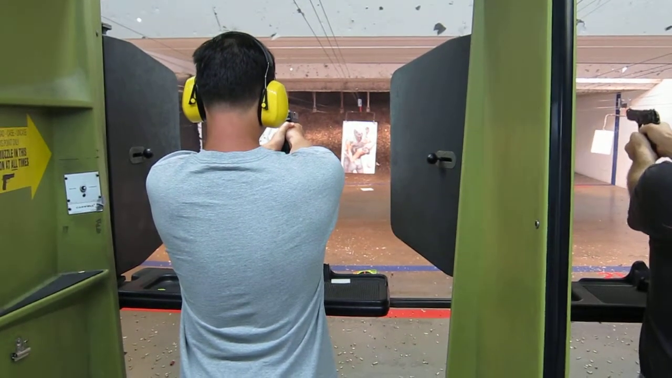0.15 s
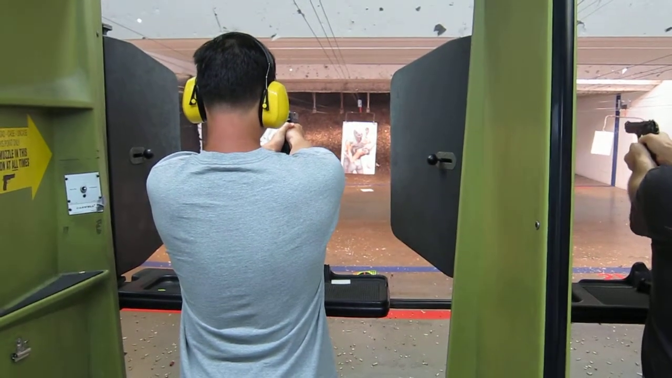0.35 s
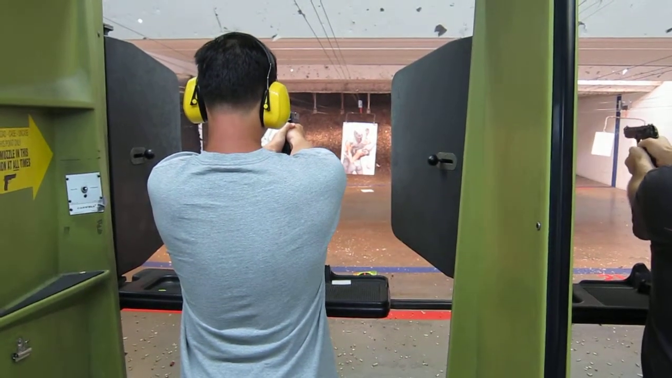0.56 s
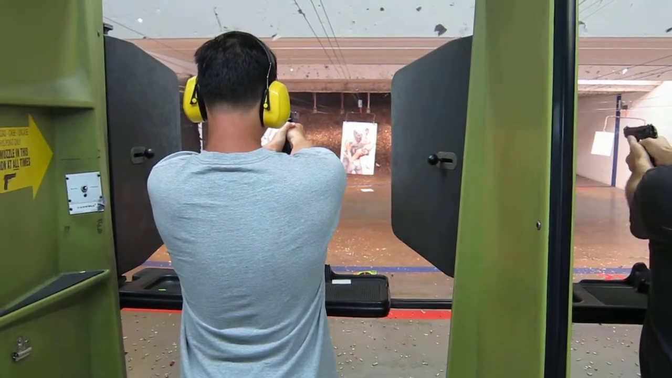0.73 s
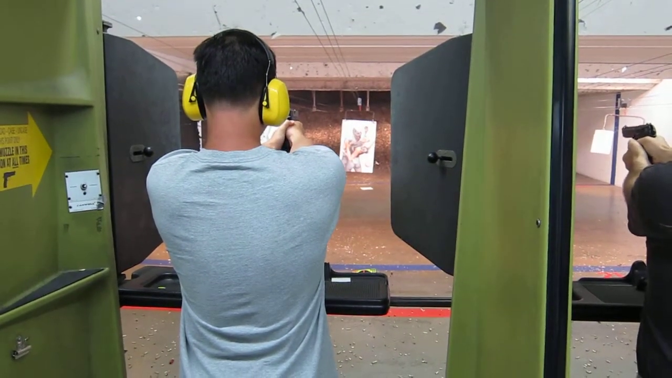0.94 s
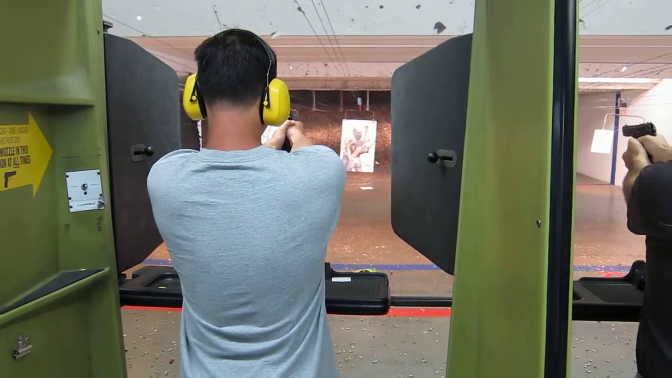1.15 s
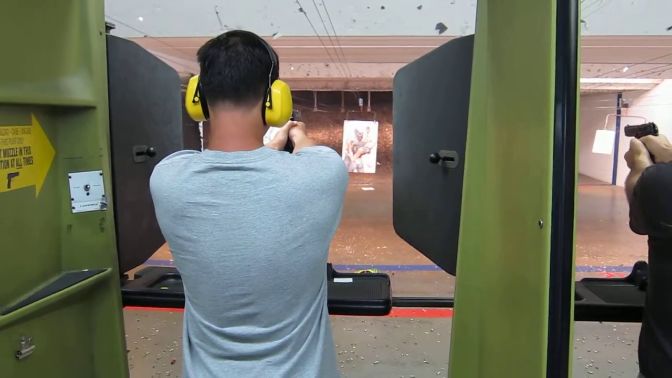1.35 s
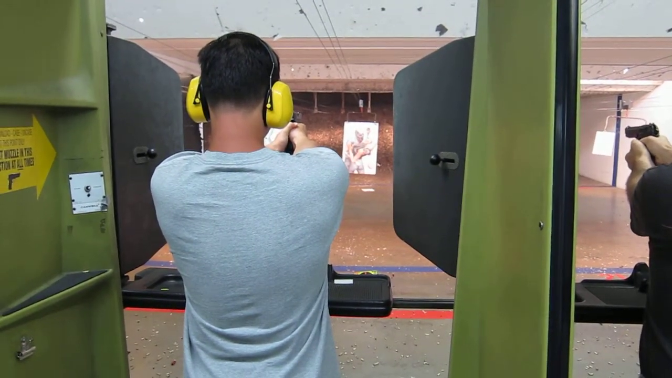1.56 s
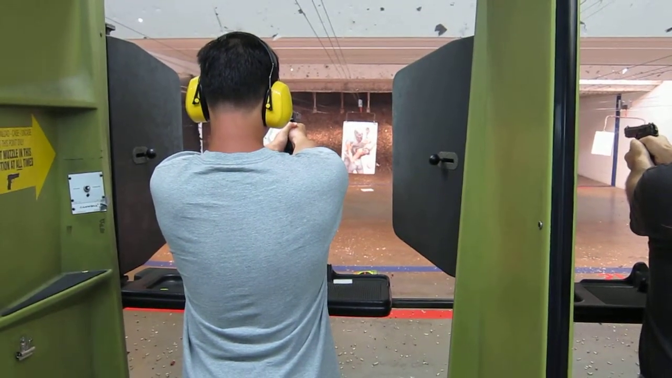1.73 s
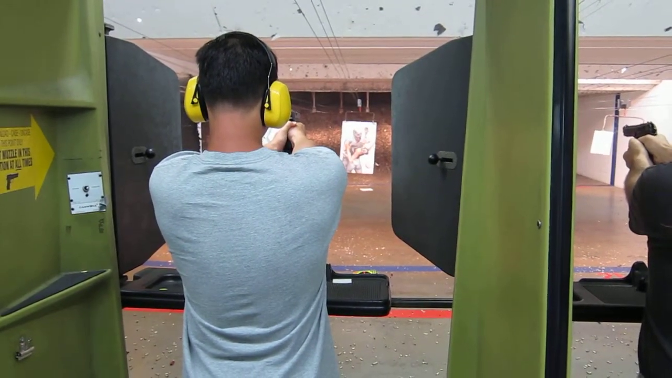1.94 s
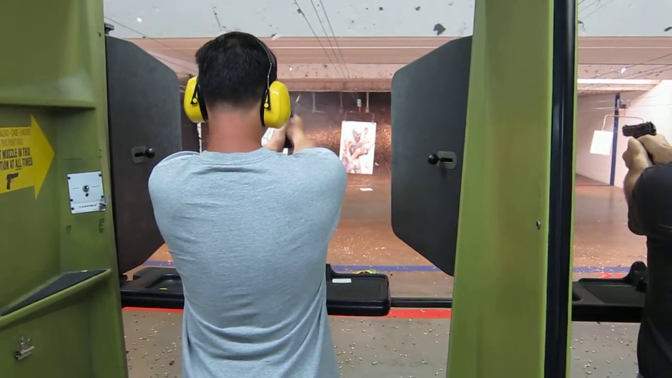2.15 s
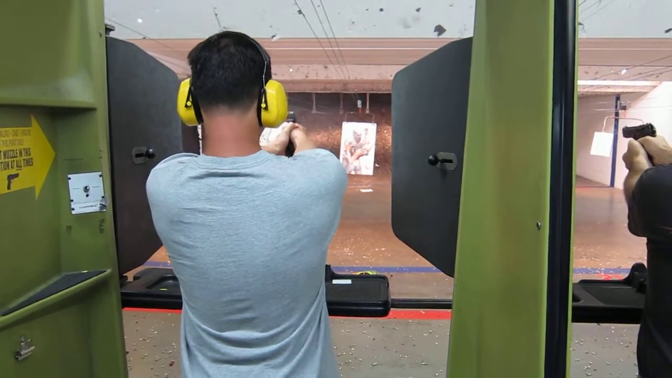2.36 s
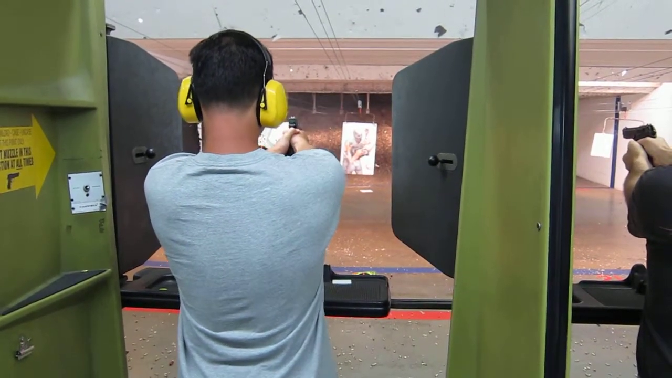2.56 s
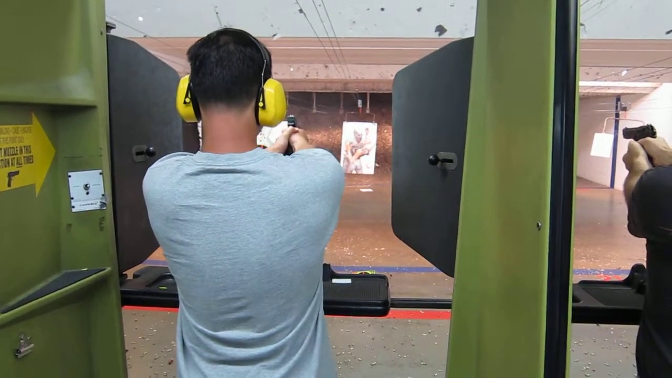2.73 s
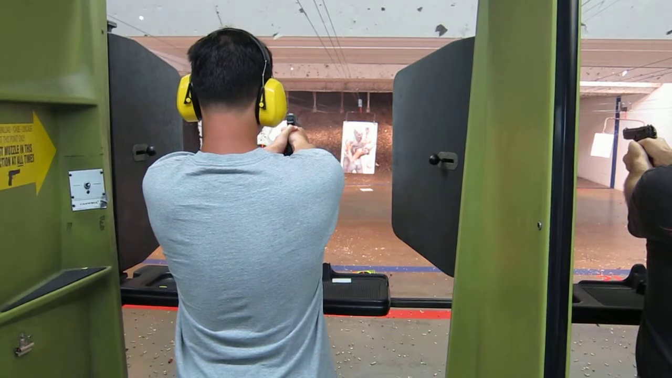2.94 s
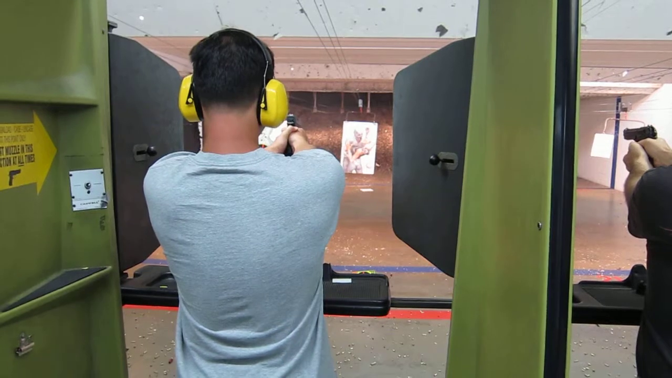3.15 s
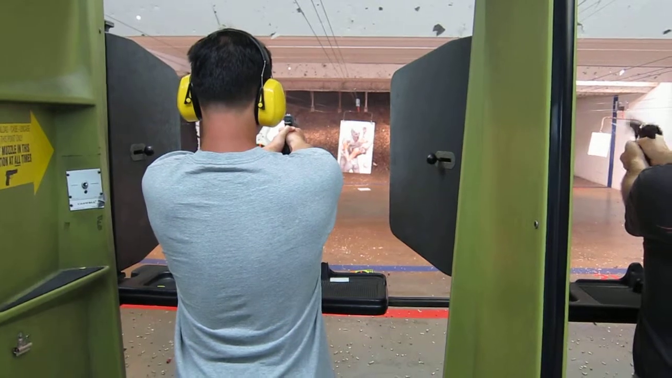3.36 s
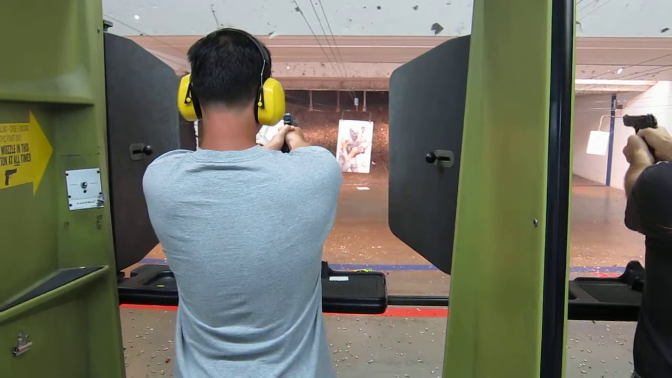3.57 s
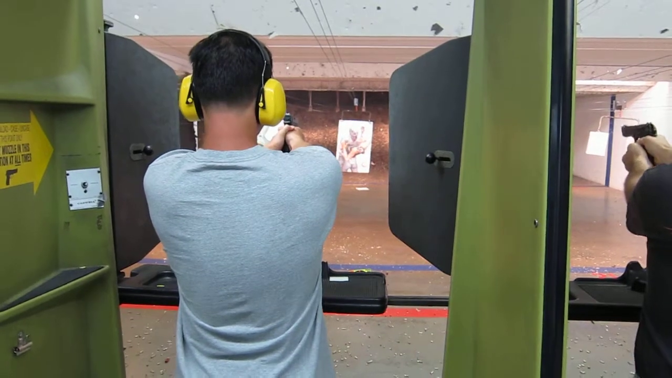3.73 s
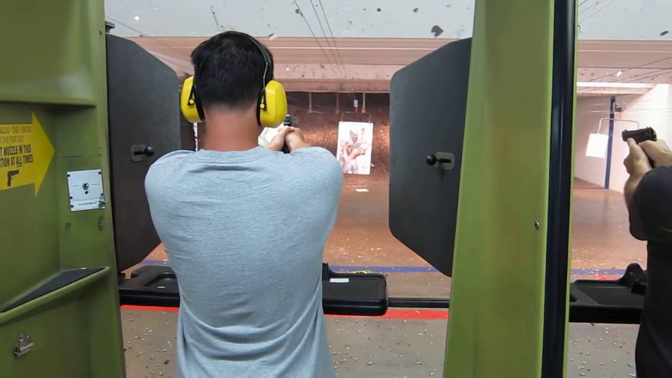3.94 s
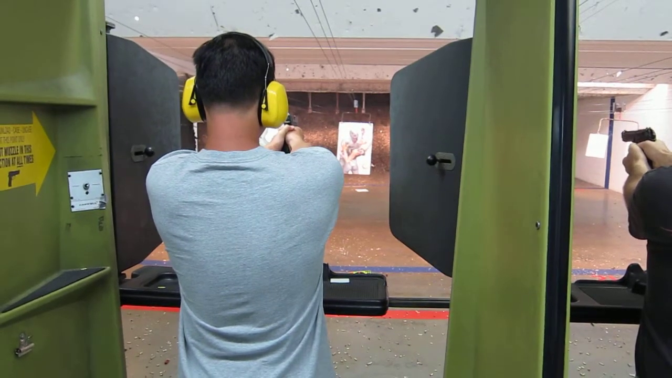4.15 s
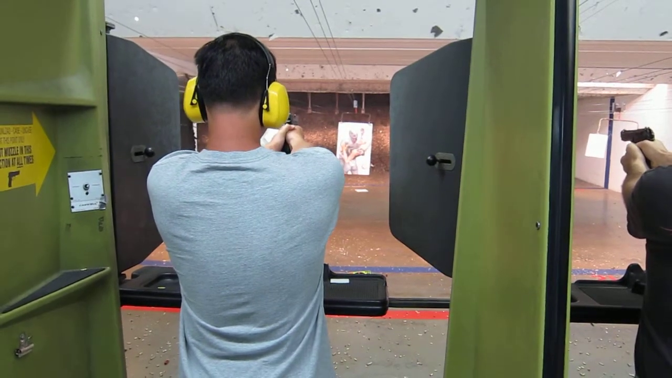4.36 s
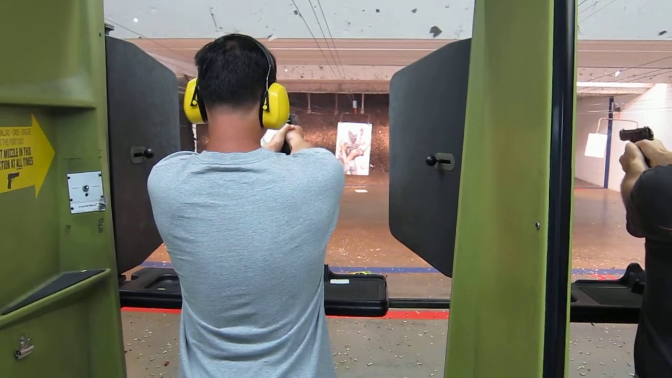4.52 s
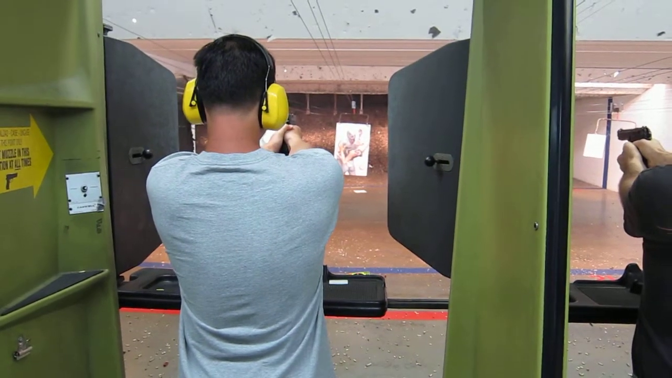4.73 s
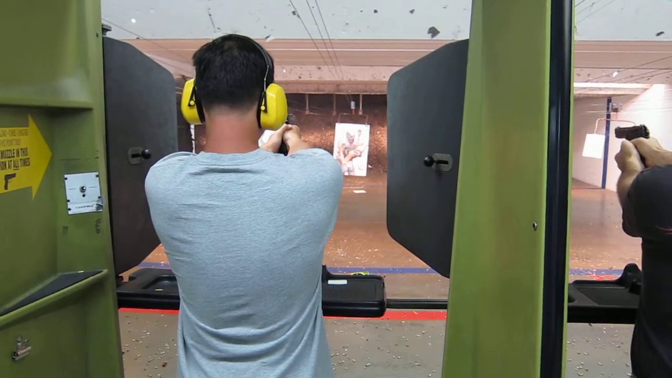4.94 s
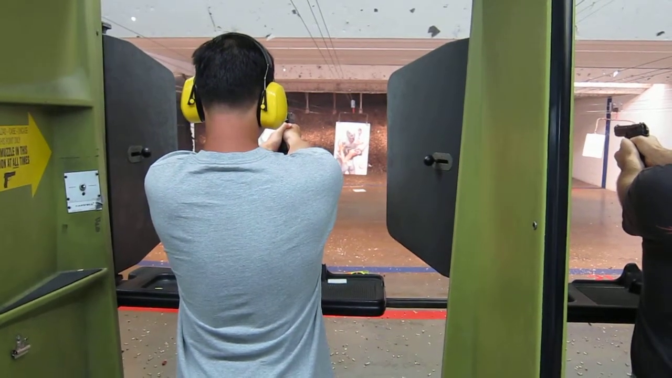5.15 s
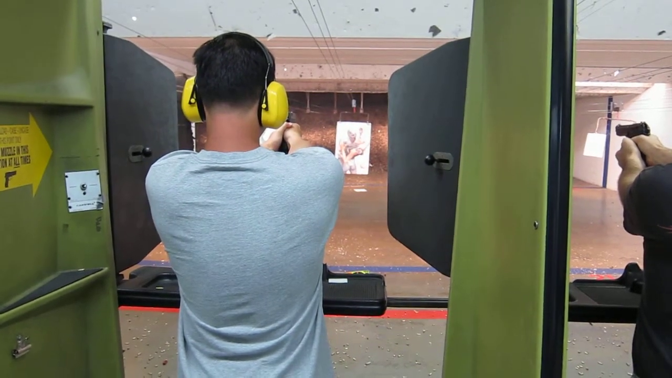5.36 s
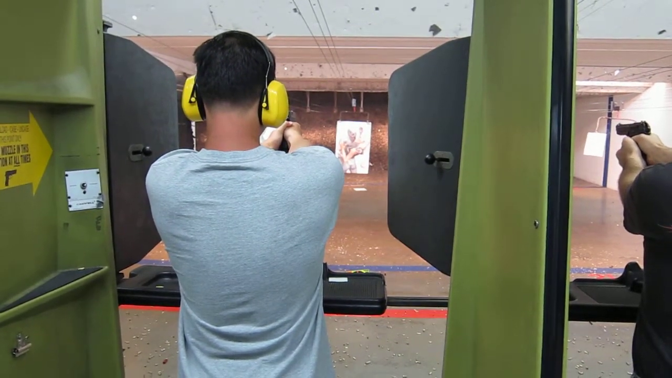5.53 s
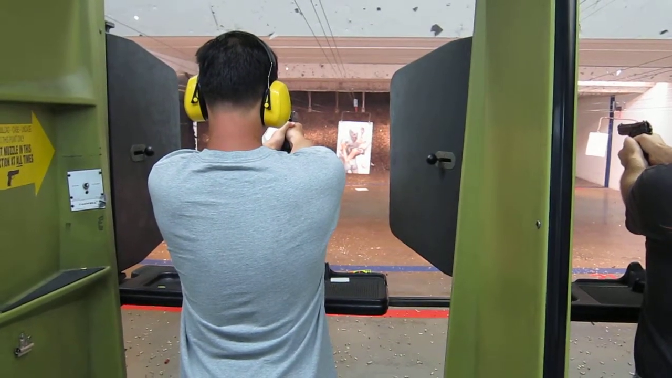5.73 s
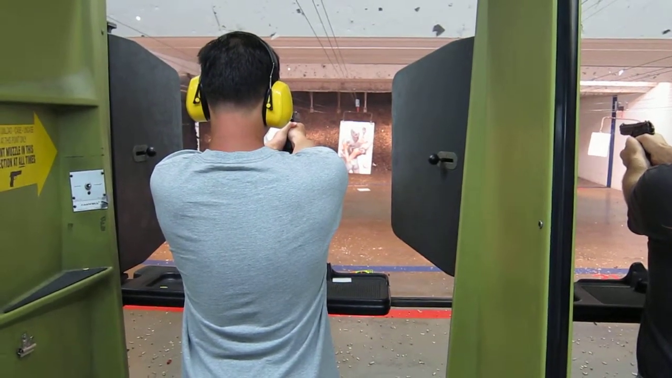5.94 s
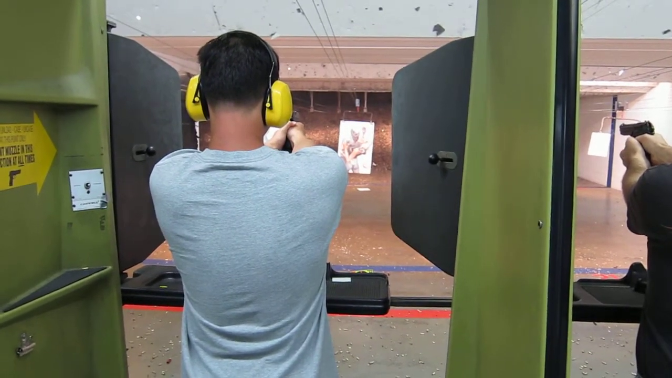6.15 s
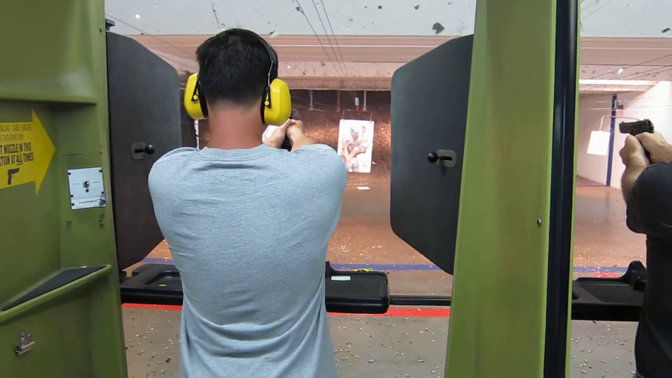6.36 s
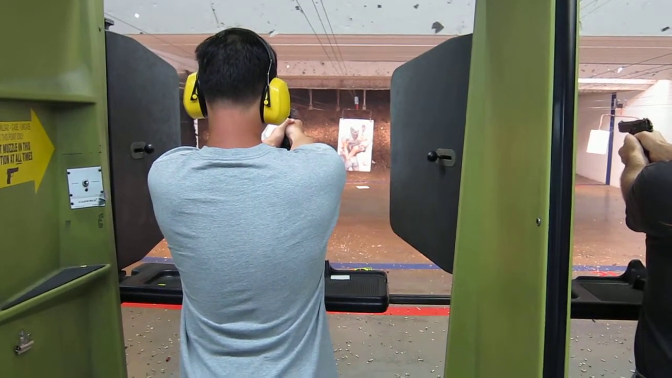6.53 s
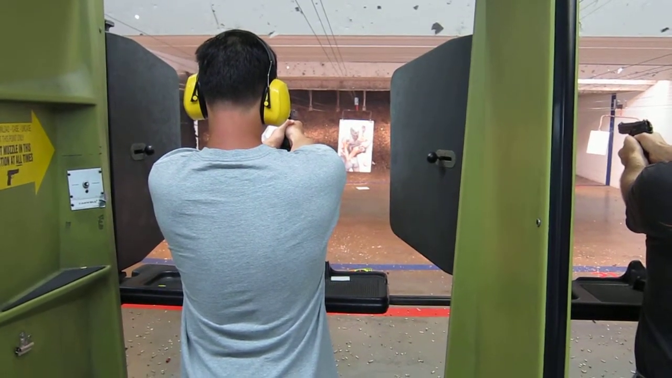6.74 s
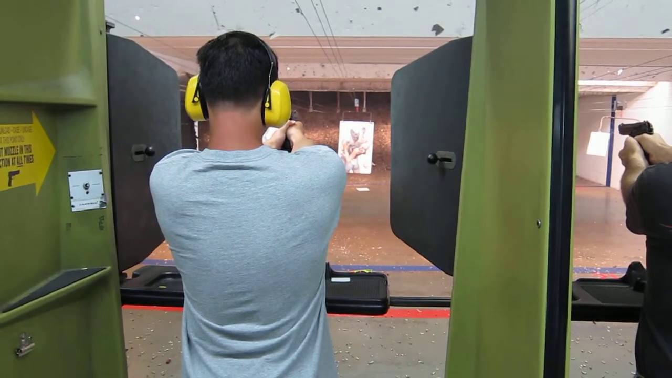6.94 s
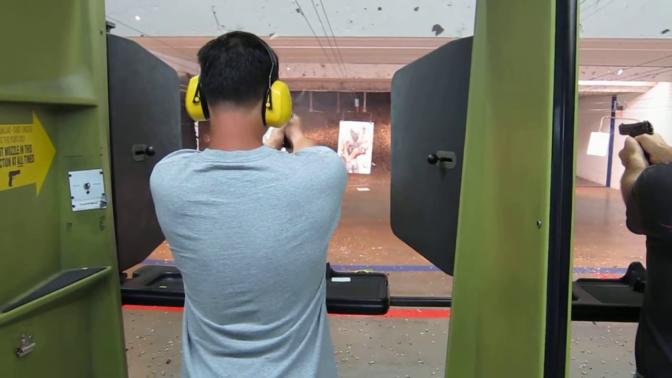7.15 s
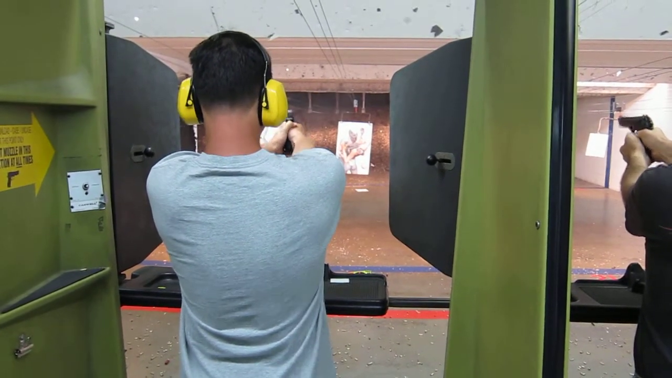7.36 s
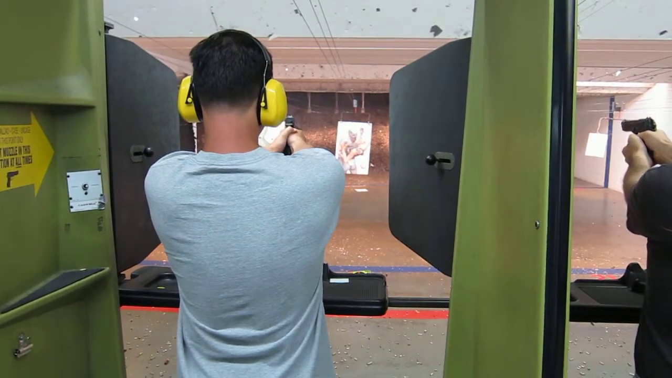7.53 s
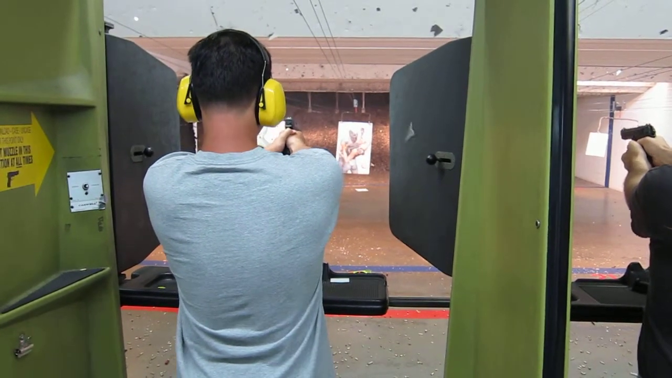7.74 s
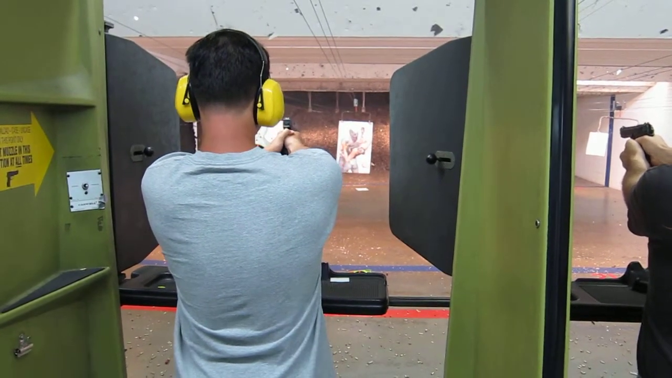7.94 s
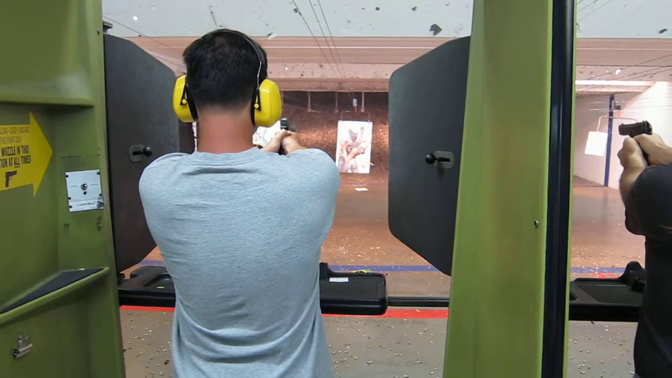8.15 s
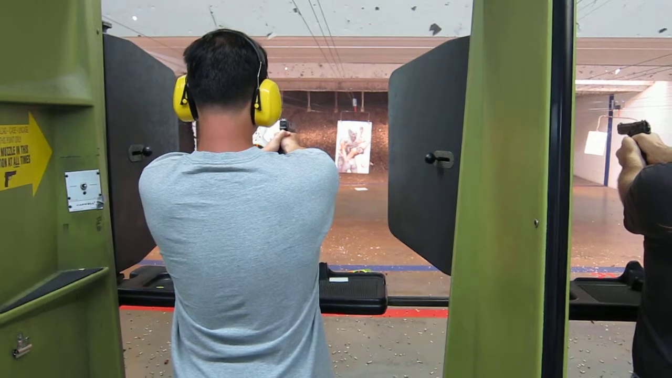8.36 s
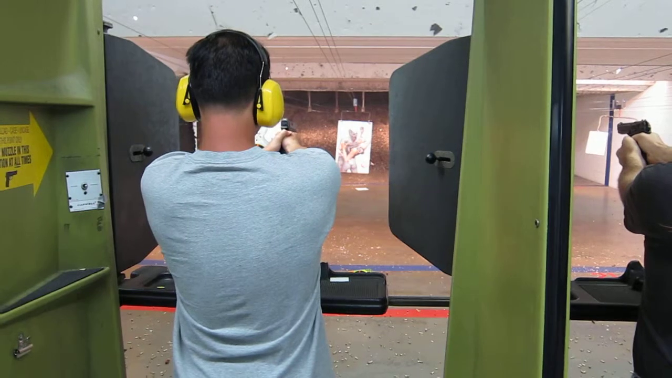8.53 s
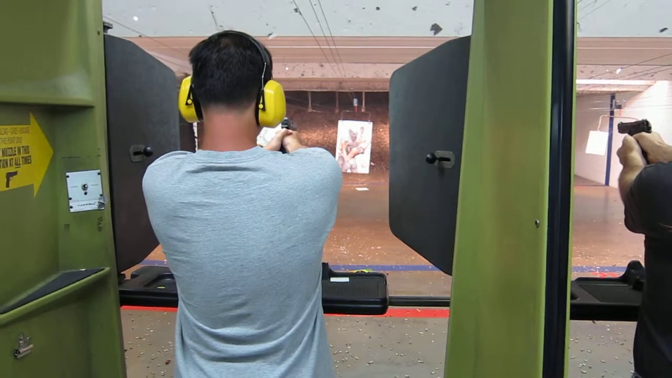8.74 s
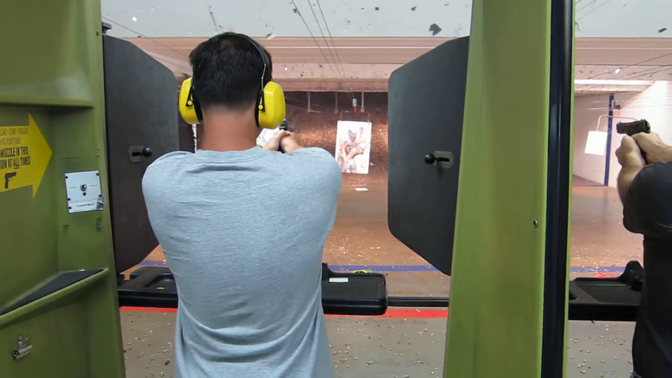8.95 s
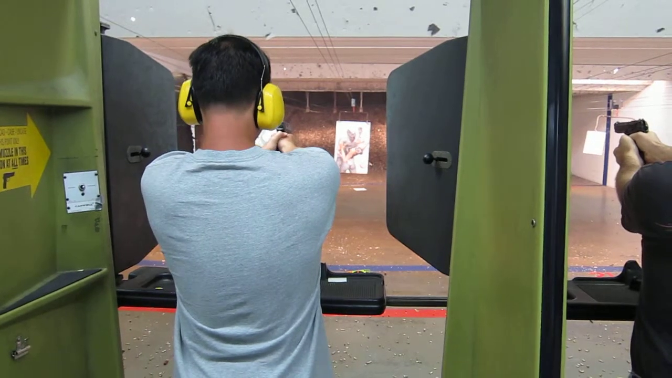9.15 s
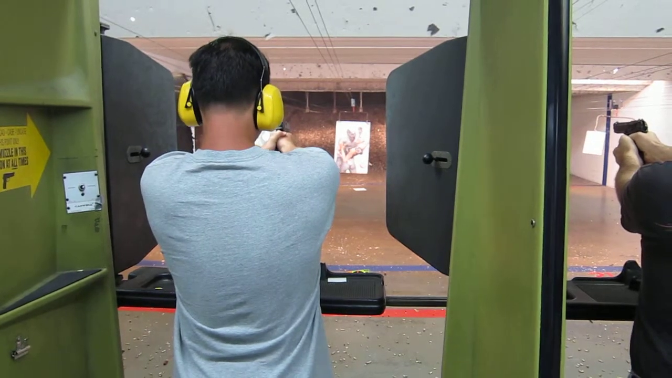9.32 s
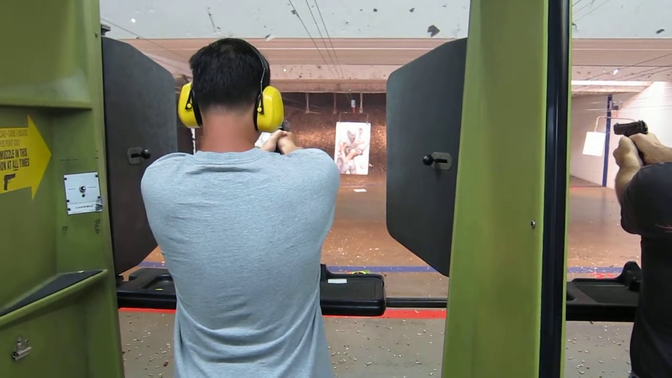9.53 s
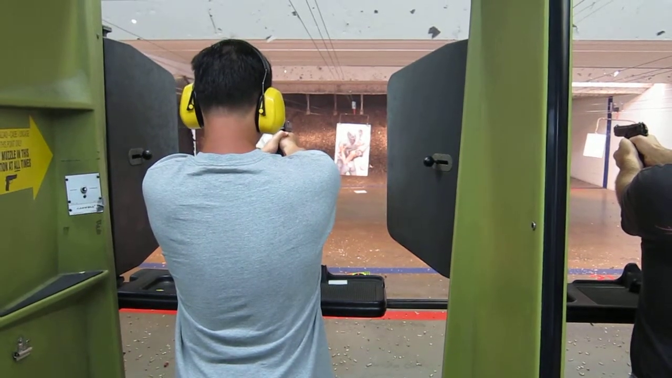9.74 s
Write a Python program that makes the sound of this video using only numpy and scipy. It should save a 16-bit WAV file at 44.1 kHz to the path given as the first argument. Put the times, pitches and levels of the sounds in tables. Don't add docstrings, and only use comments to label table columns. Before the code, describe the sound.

It begins inside the roar of a pistol shot fired just before 0 s, squared off by overload and fading through a long concrete hall. Brass tinkles on the floor at 0.8-1.5 s over low, ducked ventilation. A lone sharp shot cracks at 2.2 s, then a quick pair at 3.4 and 3.6 s, with a long dense echo. As it dies the fans creep back, and small clicks and thin wavering rings of cases come from farther booths, about 4.1-6.6 s. At 6.1 s a dull blow behind the wall rings a steel panel and a second, humming low fan starts. Another quick pair fires at 7.2 and 7.3 s, with a lingering tail. Cases knock and ring close by from 8.1 to 9.0 s, one striking the bench at 8.6 s as a motor winds up into steady hiss. A final, heavily overloaded shot booms at 9.7 s.

```python
import sys
import numpy as np
from scipy import signal
from scipy.fft import rfft, irfft, next_fast_len
from scipy.io import wavfile
from scipy.ndimage import uniform_filter1d, map_coordinates

SR = 44100
rng = np.random.default_rng(int(sys.argv[2]) if len(sys.argv) > 2 else 0)


def materialize(psi):
    bounded = np.clip(np.atleast_2d(psi).T, -1, 1)
    quanta = np.round(bounded * 32767).astype(np.int16)
    wavfile.write(sys.argv[1], SR, quanta)


def to_linear_factor(level_db):
    exponent = np.asarray(level_db, float) / 20
    return 10 ** exponent


N = 431738

SHOT_TIMES = [
    -.06,
    2.1572,
    3.3848,
    3.566,
    7.1651,
    7.335,
    9.6843,
]
# (blast [dB], brightness [dB], crack [dB], far end [dB])
SHOT_LEVELS = [
    (7.5, 0, 15.5, -0.5),
    (6.5, -0.5, -5, 3),
    (8, 0, -3, -1),
    (6.5, -0.5, -13.5, -1.5),
    (8.5, -1, -1, 3.5),
    (-2, 6.5, -7, 10.5),
    (18, -1, -6.5, -3),
]
IN_VIEW = [1, 1, 0, 1, 1, 1, 0]
# (frequency [Hz], density [dB per Hz])
MUZZLE_COLOUR = [(600, -35.5), (1500, -8), (3000, 0), (6000, -2.5), (11000, -10), (18000, -16.5)]
# (frequency [Hz], density [dB per Hz])
HALL_COLOUR = [(18, -67), (30, -32), (58, -13.5), (103, -14), (337, -1.5), (508, -3), (801, -3),
               (1240, -8.5), (1700, -17.5), (2510, -19), (4400, -26.5), (4900, -30), (7000, -35),
               (9100, -68.5), (15400, -120)]
# (frequency [Hz], density [dB per Hz])
AIR_LOSS = [(9000, -36), (15000, -55.5), (20000, -77)]
# (frequency [Hz], level [dB])
BOOTH_EQ = [(60, 17.5), (130, 1.5), (658, -8), (1150, 9.5), (1600, 9), (3200, 14.5), (13100, 11.5)]
# (frequency [Hz], level [dB])
HALL_EQ = [(60, 4), (250, -1), (1150, 3.5), (2000, 5), (3200, 9.5), (4300, 12.5), (6360, 15.5),
           (13100, 15.5)]
# (frequency [Hz], level [dB])
FAR_END_EQ = [(60, -21), (250, -21), (658, -19.5), (1600, -19.5), (3200, -15), (4400, -3.5), (6360, -16.5),
              (13100, -21)]
# (frequency [Hz], width [Hz], level over the rest [dB])
STANDING_WAVES = [(145, 6.6, -8), (262.5, 8.7, -1.5), (311.4, 9.9, -13), (364.3, 16, 0), (653, 30, -8.5)]
# (frequency [Hz], correlation [-1 to 1])
STEREO_LIKENESS = [(60, 1), (180, 0.99), (550, 0.99), (1650, 0.63), (4970, -0.2), (15000, 0.1)]
# (frequency [Hz], density [dB per Hz])
VENT_COLOUR = [(18, -38), (30, -2.5), (70, -2), (108, -17.5), (129, -7), (209, -11.5), (268, -12),
               (287, -7.5), (1010, -13), (1660, -20), (2040, -22.5), (2240, -22.5), (7000, -41.5),
               (9100, -69.5), (15400, -120)]
# (frequency [Hz], level over its rumble [dB])
FAN_HUM = [(259, -11), (318, -14), (367, -13)]
# (frequency [Hz], density [dB per Hz])
HISS_COLOUR = [(1500, 0.5), (3000, -2), (5300, -5), (5700, -3), (6100, -9), (10000, -10.5), (12500, -13.5),
               (15000, -17), (15500, -12.5), (17000, -41)]
# (frequency [Hz], density [dB per Hz])
BLOWER_COLOUR = [(30, -14), (80, -1), (140, 4), (230, 7), (400, -30.5)]
# (time [s],
# click [dB], ring [dB], floor knock [dB], knock pitch [Hz])
LOW_CASES = [(0.7741, -39.5, -37, -38, 5000), (0.9847, -66, -65, -49, 5000), (1.133, -39, -50, -46, 5700),
             (1.3167, -49, -63, -42, 5500), (1.4217, -60.5, -57, -57, 5000), (1.4494, -76, -61, -52, 5000),
             (8.091, -35.5, -42, -37, 4800), (8.6258, -31, -37, -34, 4800), (8.7949, -56, -42.5, -52, 4800),
             (8.9491, -47, -46, -53, 4800)]
# (time [s], click [dB], ring [dB], floor knock [dB], knock pitch [Hz])
HIGH_CASE = [
    (8.2458, -34.5, -32, -16, 4630),
    (8.4492, -32.5, -51, -18.5, 4400),
    (8.851, -37.5, -46, -35, 5200),
    (9.0094, -50, -50, -43, 5000),
]
# (time [s], level [dB])
FAR_TICKS = [(1.6394, -72), (2.7688, -56.5), (4.114, -45.5), (4.2374, -54.5), (4.3545, -47), (4.8594, -66),
             (5.0194, -62), (5.2494, -57), (5.3094, -66), (6.4911, -64)]
# (time [s], frequency [Hz], level [dB])
FAR_CASES = [(4.39, 7245, -50), (4.39, 10865, -53), (4.55, 11490, -61), (4.72, 13250, -76),
             (4.902, 10020, -67), (5.25, 11510, -59), (5.32, 7690, -58), (5.32, 13320, -72),
             (5.525, 11460, -58), (5.55, 7515, -60), (5.62, 9970, -68), (5.7, 11050, -69),
             (5.82, 15550, -74), (5.9, 13250, -72), (6.17, 10000, -71), (6.2, 7700, -76),
             (6.52, 13275, -67), (6.64, 9990, -60)]
# (time [s], peak [dB], t60 [s], echo t60 [s])
THUD = [
    (6.133, -17, 0.31, 1.66),
]
# (frequency [Hz], density [dB per Hz])
THUD_COLOUR = [(60, -25), (150, -10), (230, -1.5), (500, -14.5), (1200, -11), (3200, -16.5), (7000, -25),
               (11000, -29), (15500, -39.5)]
# (frequency [Hz], level [dB], t60 [s])
PANEL_MODES = [(148.5, -39, .5), (216, -46, 0.33), (1244, -50, .4), (1825, -40, .2), (3200, -47, 0.83),
               (3230, -46, 0.13)]
# (time [s], peak [dB], t60 [s], echo t60 [s])
BENCH = [
    (8.6063, -13.5, 0.2, 0.46),
]
# (frequency [Hz], density [dB per Hz])
BENCH_COLOUR = [(1000, -16), (1800, 1.5), (3500, 2.5), (6000, -1), (10000, -14), (16000, -15)]
# (frequency [Hz], gain [dB])
MIC_EQ = [(30, 2), (300, -1), (1800, -2), (3500, -1), (7000, -3.5), (11000, -2), (16000, -5.5)]

# (t60 of the walls [s], bass leaks out below [Hz], air absorbs above [Hz])
BOOTH_T60, HALL_T60, FAR_T60 = (0.37, 30, 6000), (1.655, 30, 15500), (5.57, 9.3, 10800)
BUILD_S, BUILD_HZ = 0.071, 2500
JUMP_S, SHADED_JUMP_S, BENCH_ECHO_S = .0001, .00035, .0008
WAKE_TOP_DB, ASLEEP_S, SHADED_DB = 10, .6, 4
VENT_DB, HISS_DB = -35.5, -58
DUCK_DB, RECOVER_S = 17.5, 1.86
BLOWER_HZ, BLOWER_TONE = 134.6, 1.3
BLOWER_DB, BLOWER_RISE_S = -10, .25
LOW_HZ, HIGH_HZ = 10573, 10915
CASE_T60, KNOCK_T60 = 0.3, .011
FAR_DB, FAR_RING_T60, FAR_SWELL_S = -2, 1.5, .012
RATTLE_DB, RATTLE_T60 = -5, .5
FLUTTER_DB, FLUTTER_PER_S = 3, 14
MOTOR_S, MOTOR_DB, WIND_UP_S, MOTOR_RUMBLE_DB = 8.57, -30, 0.22, -35


def unit(x):
    return x / np.sqrt(np.mean(x ** 2) + 1e-20)


def along(points, hz):
    f, v = np.transpose(points)
    return np.interp(np.log(hz + 1), np.log(f + 1), v)


def filtered(x, response):
    m = next_fast_len(N + 8192)
    return irfft(rfft(x, m) * response(np.fft.rfftfreq(m, 1 / SR)), m)[..., :N]


def rush(spectrum):
    def mid_side(hz):
        turn = np.arccos(np.clip(along(STEREO_LIKENESS, hz), -1, 1)) / 2
        return to_linear_factor(along(spectrum, hz)) * [np.cos(turn), np.sin(turn)]

    mid, side = filtered(rng.standard_normal((2, N)), mid_side)
    return unit(np.array([mid + side, mid - side]))


def fading(times, power, t60):
    places = np.round((np.asarray(times) + 1) * SR).astype(int)
    jumps = np.bincount(places, power, N + SR)
    return signal.lfilter([1], [1, -to_linear_factor(-120 / (t60 * SR))], jumps)[SR:]


def place(out, s, sound):
    out[:, round(s * SR):][:, :SR] += sound


def ring(hz, db, t60, swell, beat_hz):
    t = np.arange(int(min(t60, 1) * SR)) / SR
    detune, phase = rng.random((2, 5, 2, 1))
    modes = np.sin(2 * np.pi * ((hz + beat_hz * (detune - .5)) * t + phase)).sum(0)
    envelope = to_linear_factor(db - 60 * t / t60) * (1 - np.exp(-t / swell))
    return np.pad(envelope * modes, [(0, 0), (0, SR - len(t))])


def standing(x):
    def resonance(f, centre, width, db):
        return to_linear_factor(db) * 1j * f * width / (centre * centre - f * f + 1j * f * width)

    return filtered(x, lambda f: 1 + sum(resonance(f, *wave) for wave in STANDING_WAVES))


def t60_at(hz, walls, leak_hz, air_hz):
    return 1 / (1 / walls + leak_hz / hz + (hz / air_hz) ** 2)


def wake_db():
    calm = 1 - np.exp(-(np.diff(SHOT_TIMES, prepend=SHOT_TIMES[0]) / ASLEEP_S) ** 2)
    return (WAKE_TOP_DB - SHADED_DB * (1 - np.array(IN_VIEW))) * calm


def muzzle_reflections():
    crack_db = np.transpose(SHOT_LEVELS)[2]
    return to_linear_factor(25) * np.sqrt(fading(SHOT_TIMES, to_linear_factor(2 * crack_db), 0.11)) * rush(MUZZLE_COLOUR)


def hall_echoes(count=12):
    blast_db, bright_db, _, reach_db = np.transpose(SHOT_LEVELS)
    echoes = unit(standing(rush(HALL_COLOUR[:-2] + AIR_LOSS)))
    centres = np.geomspace(60, 13100, count)
    out = np.zeros((2, N))
    for k, hz in enumerate(centres):
        power = to_linear_factor(2 * (blast_db + bright_db * np.log2(hz / 1000) / 3))
        booth = to_linear_factor(2 * along(BOOTH_EQ, hz)) * fading(SHOT_TIMES, power, t60_at(hz, *BOOTH_T60))
        near = to_linear_factor(2 * along(HALL_EQ, hz)) * power
        distant = to_linear_factor(2 * (along(FAR_END_EQ, hz) + reach_db)) * power
        build = BUILD_S / (1 + (hz / BUILD_HZ) ** 2) + 0.004
        late = fading(SHOT_TIMES, near, t60_at(hz, *HALL_T60))
        late += fading(SHOT_TIMES, distant, t60_at(hz, *FAR_T60))
        late -= fading(SHOT_TIMES, near + distant, build * np.log(1e6))
        band = filtered(echoes, lambda f: along(np.c_[centres, np.arange(count) == k], f))
        out += band * np.sqrt(booth + np.clip(late, 0, None))
    return out


def ventilation():
    t = np.arange(N) / SR
    since_shot = t - np.array(SHOT_TIMES)[np.searchsorted(SHOT_TIMES, t) - 1]

    def tone(hz):
        return np.sin(2 * np.pi * hz * t + .008 * np.cumsum(rng.standard_normal(N)))

    running = 1 - np.exp(-np.clip(t - THUD[0][0], 0, None) / BLOWER_RISE_S)
    rumble = unit(standing(rush(VENT_COLOUR))) + sum(to_linear_factor(db) * tone(hz) for hz, db in FAN_HUM)
    rumble += to_linear_factor(BLOWER_DB) * running * (rush(BLOWER_COLOUR) + BLOWER_TONE * tone(BLOWER_HZ))
    hiss = rush(HISS_COLOUR[:6] + [(14000, -34)])
    ducking = to_linear_factor(-DUCK_DB * np.exp(-since_shot / RECOVER_S))
    return ducking * (to_linear_factor(VENT_DB) * rumble + to_linear_factor(HISS_DB) * hiss)


def near_cases():
    out = np.zeros((2, N + SR))
    for rows, hz in (LOW_CASES, LOW_HZ), (HIGH_CASE, HIGH_HZ):
        for s, _, ring_db, knock_db, knock_hz in rows:
            place(out, s, ring(hz, ring_db, CASE_T60, 0.0015, beat_hz=152))
            place(out, s, ring(knock_hz, knock_db + 2.5, KNOCK_T60, 0.00036, beat_hz=1200))
            place(out, s, ring(0.88 * knock_hz, knock_db - 4.5, KNOCK_T60, .0004, beat_hz=2000))
    return out[:, :N]


def landing_clicks():
    s, click_db = np.transpose(LOW_CASES + HIGH_CASE)[:2]
    far, far_db = np.transpose(FAR_TICKS)
    clicks = fading(s, to_linear_factor(2 * click_db), .007) + to_linear_factor(-41.0) * fading(s, to_linear_factor(2 * click_db), 0.28)
    clicks += to_linear_factor(-14) * fading(far, to_linear_factor(2 * far_db), 0.15)
    bright = rush([(3000, -26), (6000, 2), (9000, 5.5), (13000, 3.5), (17000, -7.5)])
    return to_linear_factor(9.5) * np.sqrt(clicks) * bright


def blasts():
    out, t = np.zeros((2, N + SR)), np.arange(400) / SR
    wall_band = signal.butter(2, [1500, 6000], "band", fs=SR)

    def jump(u):
        return (1 - u) * np.exp(-np.abs(u)) * (u >= 0)

    sharp = jump(t / JUMP_S) + .9 * np.sin(2 * np.pi * 4000 * t) * to_linear_factor(-60 * t / .003)
    shaded = .6 * jump(t / JUMP_S) + 2.5 * jump((t - BENCH_ECHO_S) / SHADED_JUMP_S)
    for s, db, seen in list(zip(SHOT_TIMES, wake_db(), IN_VIEW))[1:]:
        start = round(s * SR)
        out[:, start:][:, :len(t)] -= to_linear_factor(db + 22) * (sharp if seen else shaded)
        noise = signal.lfilter(*wall_band, rng.standard_normal((2, len(t))))
        lead = to_linear_factor(db - 26 - 60 * t / 0.011) * noise * (t < .0022)
        out[:, start - len(t):][:, :len(t)] += lead[:, ::-1]
    return out[:, :N]


def far_cases():
    out = np.zeros((2, N + SR))
    for s, hz, db in FAR_CASES:
        waver = map_coordinates(rng.standard_normal(FLUTTER_PER_S + 2), [np.arange(SR) * FLUTTER_PER_S / SR])
        rolling = ring(hz, db + FAR_DB, FAR_RING_T60, FAR_SWELL_S, beat_hz=130)
        place(out, s, to_linear_factor(FLUTTER_DB * waver) * rolling)
        place(out, s, ring(hz, db + RATTLE_DB, RATTLE_T60, .003, beat_hz=596))
    return out[:, :N]


def far_case_haze():
    s, _, db = np.transpose(FAR_CASES)
    power = uniform_filter1d(fading(s, to_linear_factor(2 * db), 1.0), size=SR // 12)
    shimmer = rush([(6000, -20), (7400, -4), (9000, -9), (10800, -3), (13000, -14), (16000, -42)])
    return to_linear_factor(-4.5) * np.sqrt(np.abs(power)) * shimmer


def blow(event, colour, echo_db):
    s, db, t60, echo_t60 = event[0]
    shape = fading([s], [1], t60) + to_linear_factor(2 * echo_db) * fading([s], [1], echo_t60)
    return to_linear_factor(db - 8.5) * np.sqrt(shape) * rush(colour)


def steel_panel():
    out = np.zeros((2, N + SR))
    for hz, db, t60 in PANEL_MODES:
        place(out, THUD[0][0], ring(hz, db, t60, .002, beat_hz=.015 * hz))
    return out[:, :N]


def carrier_motor():
    to_go = (MOTOR_S - np.arange(N) / SR) / WIND_UP_S
    short_db = 40 * np.exp(np.clip(to_go, None, 2))
    rumble = rush([(60, -52)] + VENT_COLOUR[5:])
    return to_linear_factor(-short_db) * (to_linear_factor(MOTOR_DB) * rush(HISS_COLOUR) + to_linear_factor(MOTOR_RUMBLE_DB) * rumble)


def scene():
    guns = muzzle_reflections() + hall_echoes() + blasts()
    brass = near_cases() + landing_clicks() + far_cases() + far_case_haze()
    thud = blow(THUD, THUD_COLOUR, echo_db=-10.0) + steel_panel()
    bench = blow(BENCH, BENCH_COLOUR, echo_db=-17.5)
    return (guns + ventilation() + brass + thud + carrier_motor() + bench) * to_linear_factor([[.9], [-.9]])


def band_limit(x):
    return signal.sosfilt(signal.butter(12, 16460, fs=SR, output="sos"), x)


def record(dry):
    top = .4 * (1 + fading(SHOT_TIMES, to_linear_factor(wake_db()) - 1, .012))
    hard = 5.0
    squared = dry / (1 + np.abs(dry / top) ** hard) ** (1 / hard)

    def microphone(f):
        notch = (8250 ** 2 - f * f + 1j * f * 330) / (8250 ** 2 - f * f + 1j * f * 1700)
        droop = 1j * f / (1j * f + 110)
        edge = to_linear_factor(-36 * (1 + np.tanh((f - 15900) / 90)))
        return notch ** 2 * droop * edge * to_linear_factor(along(MIC_EQ, f))

    return band_limit(np.clip(filtered(squared, microphone), -1, 1))


dry = scene()
out = record(dry)
materialize(out)
```